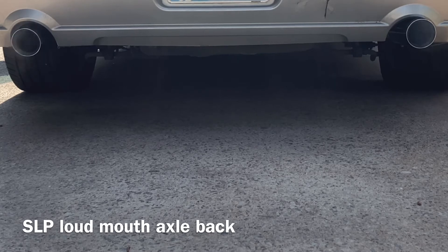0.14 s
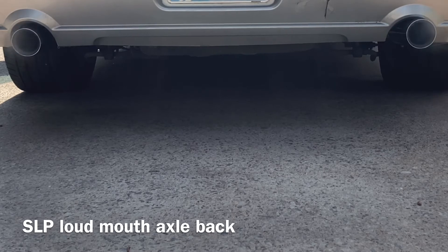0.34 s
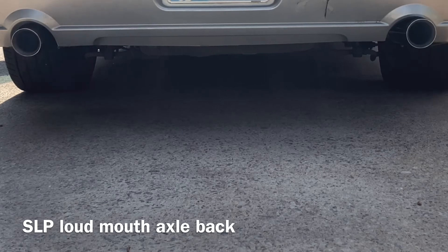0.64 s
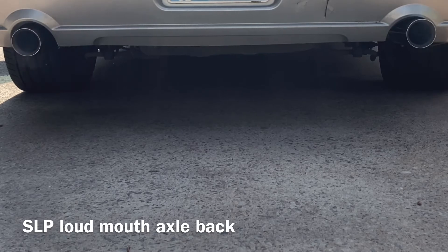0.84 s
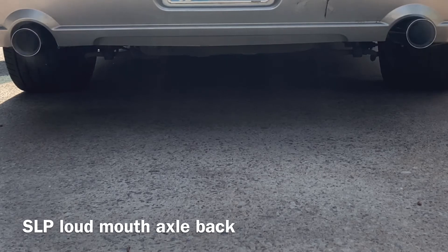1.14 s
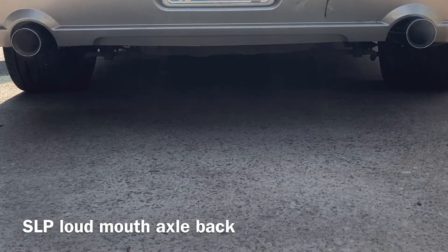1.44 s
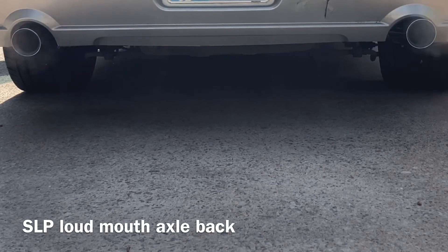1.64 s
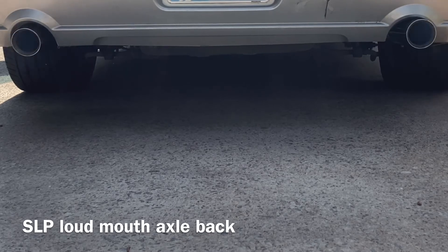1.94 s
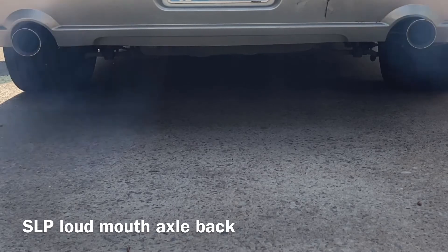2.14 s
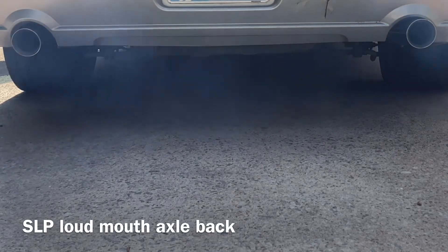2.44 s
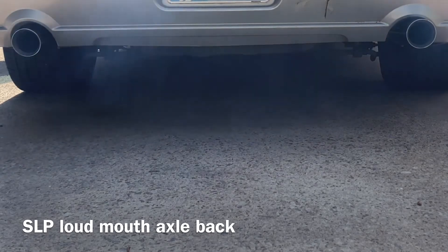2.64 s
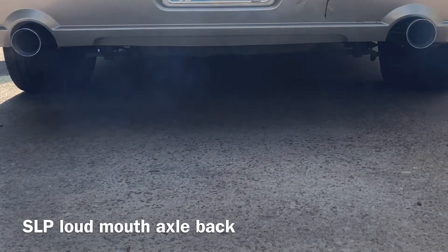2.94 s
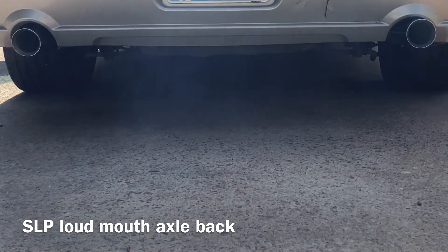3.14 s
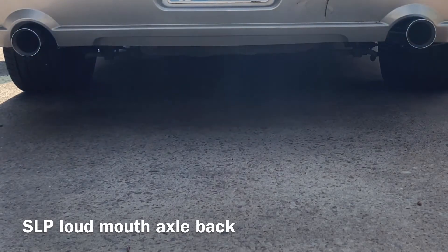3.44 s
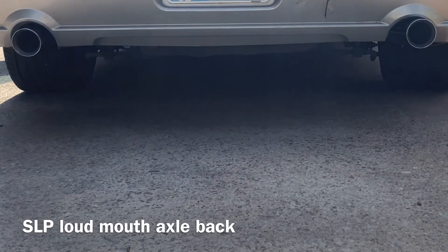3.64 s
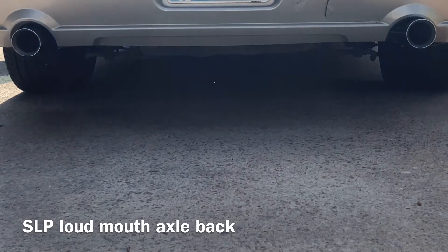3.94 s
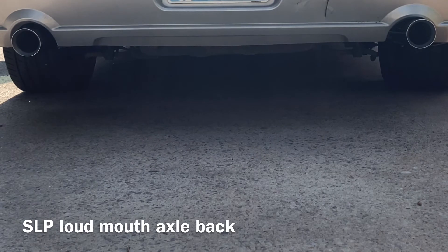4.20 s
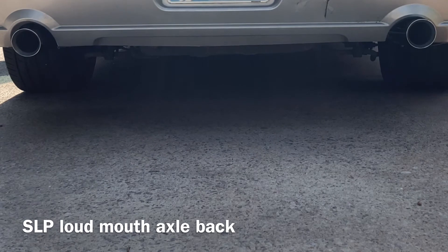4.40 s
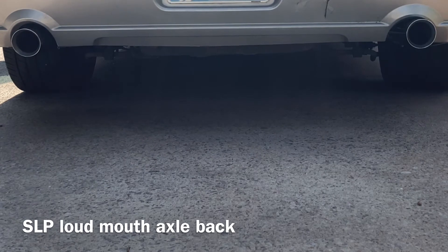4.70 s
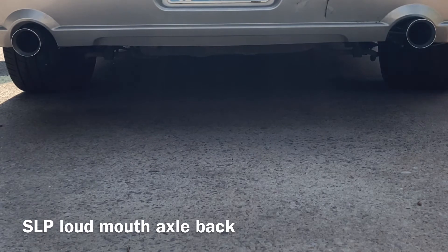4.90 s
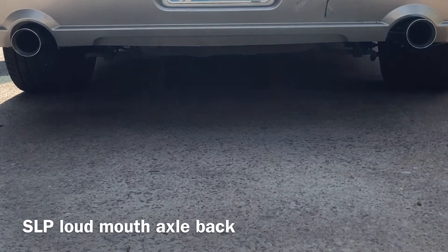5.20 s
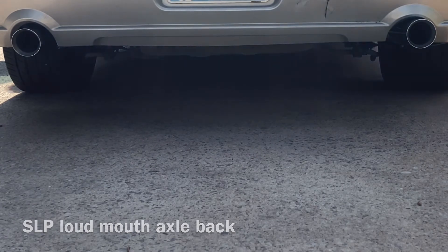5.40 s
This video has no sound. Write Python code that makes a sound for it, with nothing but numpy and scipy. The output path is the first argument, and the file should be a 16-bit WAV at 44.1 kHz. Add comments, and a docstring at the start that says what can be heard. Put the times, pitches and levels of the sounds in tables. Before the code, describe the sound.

Heard outdoors from close behind the tailpipes, a loud V8 car engine is revved twice. The first rev booms and rasps with scattered pops, then drops into a burble. The second climbs higher and ends in a quick burst of cracks and a low thump. Puffs of exhaust briefly buffet the microphone, and the engine pops and burbles as it slows to an uneven idle.

```python
"""A cross-plane V8 with a loud twin exhaust, heard outdoors from close behind the car.
It revs at once: the train of firing pulses booms, rasps and hisses in the pipes, where unburnt fuel pops.
The throttle shuts at 0.5 s, and the falling engine burbles over a faint timing-chain whine.
A second, higher rev peaks near 2 s with sharp cracks and a thump of gas. After more pops and burble
the speed sinks, by about 5 s, to an idle made lumpy by the uneven firing of the two banks."""
import sys
import numpy as np
from scipy import signal
from scipy.fft import rfft, irfft, next_fast_len
from scipy.io import wavfile
from scipy.ndimage import uniform_filter1d

SR = 44100
rng = np.random.default_rng(int(sys.argv[2]) if len(sys.argv) > 2 else 0)


def int16_out(signal):
    """Quantize to a 16-bit WAV file."""
    q = np.round(np.clip(np.atleast_2d(signal).T, -1, 1) * 32767)
    wavfile.write(sys.argv[1], SR, q.astype(np.int16))


N = 245195
TIME = np.arange(N) / SR
PADDED = next_fast_len(N + 16384)
BINS = np.maximum(np.arange(PADDED // 2 + 1) * SR / PADDED, 1)
IDLE_HZ, SHOCK_HZ = 89, 240   # firing rates: at idle, and from which driven pulses steepen fully

# Engine speed. Each row: time in seconds, firing rate in Hz.
FIRING_RATE = [(0.0, 88.3), (0.07, 95.5), (0.22, 136.6), (0.42, 217.3), (0.5, 233.4), (0.75, 213.2),
               (0.83, 215.4), (0.9, 191.8), (1.24, 144.8), (1.55, 115.6), (1.62, 122.3), (1.94, 255.0),
               (2.08, 323.9), (2.17, 336.3), (2.33, 330.7), (2.66, 279.8), (3.29, 194.3), (3.53, 165.4),
               (4.07, 120.8), (4.36, 105.2), (4.7, 93.9), (4.92, 89.7), (5.56, 88.3)]
# Each row: throttle opening and shutting in seconds, depth of fuel cut from 0 to 1,
# overrun start and decay time in seconds, overrun strength from 0 to 1.
REVS = [(-.04, 0.49, 0.08, .8, .26, 0.95), (1.555, 2.035, 0.92, 2.393, 0.12, 0.55)]
# In firing order. Each row: bank 0 or 1, pulse strength in dB.
CYLINDERS = [(0, 5), (1, 5.5), (1, 2), (0, 2), (1, -3), (0, -1), (0, 6.5), (1, -11)]
# Pipe resonances met by the firing tone. Each row: firing rate in Hz, level in dB.
TONE_COASTING = [(88, -20.5), (103, -14.5), (114, -18.5), (128, -17.5), (148, -12.5), (168, -18.5),
                 (205, -21), (230, -20.5), (250, -16), (270, -23.5), (320, -23)]
TONE_DRIVEN = [(88, -9.5), (105, -7.5), (125, -9.5), (152, -9), (175, -12.5), (220, -13), (300, -12.5),
               (335, -19)]
# Each row: multiple of the cycle rate, then relative level in dB idling, coasting, driven, in fuel cut.
OVERTONE_OUTLINE = [(2, -17, -9, -30, -11.5), (5.9, 0, 0, -7.5, 6), (8.06, 1, 0.5, -8.5, -10.5),
                    (12.1, -1.5, -3.5, -1, -1), (14.4, 0.5, -2.5, -7.5, -9), (16, 3.5, 3.5, 4.5, -4),
                    (17.5, -10, -12, -13, -2), (24, -8.5, -6, -3, -9), (25.4, -12, -12, -14, -11),
                    (40.5, -7, -13, -11.5, -20)]
# Offset of the odd multiples in dB, for the same four states.
ODD_DB = (-6, -8, -1.5, -4)
# Layer gains. Each lists, in dB: idle level, change per doubling of speed, level at full load,
# change in fuel cut, change in overrun.
OVERTONE_LEVEL = (-24.7, 1, -15.5, -8.5, 0.5)
BURBLE_LEVEL = (-35.5, 7, -16, -14.5, 12.5)
RASP_LEVEL = (-40.5, -1.5, -22, -1.5, 1)
HISS_LEVEL = (-51.5, 2.5, -31.5, -4.5, 0.5)
# Spectral envelopes of the sources. Each row: frequency in Hz, gain in dB.
PIPE_SPECTRUM = [(40.0, -21), (70.0, -10), (100.0, -9), (150.0, -1), (220.0, -4), (290.0, -3),
                 (360.0, -2.5), (440.0, -1.5), (520.0, -1), (650.0, -5), (850.0, -11), (1200.0, -19.5),
                 (2000.0, -2)]
DRONE_SPECTRUM = [(350, -19), (490, 8.5), (560, -5), (650, 2.5), (850, -21), (1030, -21.5), (1250, -22),
                  (2500, -50)]
BURBLE_SPECTRUM = [(25, -31.5), (55, -7.5), (100, -4.5), (160, -1), (250, -1), (350, -1.5), (470, 0),
                   (570, -11), (700, -9.5), (900, -22.5), (1060, -16), (1250, -30.5), (2500, -40.5),
                   (6000, -45)]
RASP_SPECTRUM = [(300, -36), (700, 6), (1030, 2), (1230, -5.5), (1550, 1.5), (1900, 0.5), (2300, 1),
                 (2800, -1), (3300, -4.5), (3800, -19), (5000, -12), (8000, -39), (15000, -28)]
HISS_SPECTRUM = [(1200, -23), (3000, -9), (3700, 0.5), (4500, -3), (5600, 0.5), (7500, 1.5), (9500, -2),
                 (11500, 1.5), (13500, -4), (15500, -12.5)]
WHINE_SPECTRUM = [(3000, -28), (3800, -10.5), (4500, 4.5), (5300, -4.5), (6500, -40), (8000, 0),
                  (11500, 9.5), (15000, 4)]
POP_SPECTRUM = [(60, -23), (200, 8), (450, 0), (800, 6), (1300, -1.5), (2400, 4), (3200, 1), (3800, -5),
                (4800, -25), (7000, -63), (15000, -50)]
CRACK_SPECTRUM = [(200, 3), (600, 20), (1300, -26), (2500, 13), (4000, 8.5), (7000, 2.5), (11000, 0),
                  (15500, -17)]
# Fuel pops in the pipes, and cracks atop the second rev. Each row: start in seconds, level in dB.
POPS = [(.086, -9), (.153, 1), (.2215, -7), (.269, -15), (.327, -9), (.502, -21), (.54, -2), (.572, -6.5),
        (.807, -32), (.8505, -1), (.867, -23), (.897, -21), (.934, -15), (1.008, -31), (1.033, -31),
        (1.689, 0.5), (1.927, -1), (2.073, -10), (2.099, -7), (2.141, -8.5), (2.1885, -21), (2.415, -12.5),
        (2.468, -13), (2.481, -13.5), (2.507, -9), (2.534, -18), (2.627, -21)]
CRACKS = [(1.9578, -8.5), (1.9726, -2), (1.9872, -6), (2.0152, -11), (2.0285, -3.5), (2.042, -9),
          (2.056, -8.5), (2.07, -10.5), (2.1, -13)]
# Gusts of exhaust. Each row: centre in seconds, Gaussian width in seconds, level in dB.
GUSTS = [(.17, 0.044, -27), (.45, 0.049, -46), (0.845, .03, -27), (1.677, .035, -46), (2.486, 0.038, -29)]
# The two microphone ports. Each row: frequency in Hz, phase lead of the left in radians.
PORT_PHASE = [(20, .12), (300, .1), (800, .45), (1400, -.8), (2000, .3), (2700, -1.5), (3600, -2.9),
              (4150, -.5), (5200, -2.3), (6900, -6.3), (9200, -9.4), (11500, -12.6), (13700, -15.7),
              (16000, -19)]
# Each row: frequency in Hz, coherence of the turbulence at the ports from 0 to 1.
PORT_COHERENCE = [(60, .995), (300, .995), (640, .87), (1400, .72), (2500, .5), (5000, .7), (8000, .84),
                  (15000, .78)]
# Each row: frequency in Hz, level of left over right in dB.
PORT_BALANCE = [(60, -2.1), (250, 0.5), (600, 1), (1200, 1.5), (2200, 3.5), (4000, 2), (12000, -0.5)]


def from_db(db):
    """Amplitude ratio of a level in decibels."""
    return 10 ** (np.asarray(db) / 20)


def at_hz(points, hz):
    """A spectrum interpolated on a log-frequency axis."""
    known_hz, values = np.transpose(points)
    return np.interp(np.log(hz), np.log(known_hz), values)


def unit_rms(x, span_s=0.3):
    """Division by the running rms steadies the level and keeps the fast detail."""
    size = int(span_s * SR / 2)
    power = uniform_filter1d(uniform_filter1d(x * x, size), size)
    return x / np.sqrt(np.abs(power) + 1e-14)


def drift(rate_hz):
    """Slow random modulation with a spread of about 1."""
    return np.interp(TIME * rate_hz, np.arange(4096), rng.standard_normal(4096))


def colour(x, spectrum):
    """Minimum-phase filtering: folding the cepstrum makes the response causal."""
    cepstrum = irfft(np.log(from_db(at_hz(spectrum, BINS))), PADDED)
    cepstrum[1:PADDED // 2] *= 2
    cepstrum[PADDED // 2 + 1:] = 0
    return irfft(rfft(x, PADDED) * np.exp(rfft(cepstrum)), PADDED)[:N]


def impulses(at_s, sizes):
    """An impulse train, each impulse shared linearly between two samples."""
    place = np.clip(np.asarray(at_s) * SR, 0, N - 2)
    whole = place.astype(int)
    late = place - whole
    return np.bincount(whole, sizes * (1 - late), N) + np.bincount(whole + 1, sizes * late, N)


def fade(x, decay_s):
    """Exponential decay of every impulse."""
    return signal.lfilter([1], [1, -np.exp(-1 / (decay_s * SR))], x + 1e-18)


def ramp(start_s, length_s):
    """A linear rise from 0 to 1."""
    return np.clip((TIME - start_s) / length_s, 0, 1)


def engine_state(drive_s=0.07, open_s=0.12, shut_s=0.19, onset_s=0.0077, settle_s=0.97):
    """Four controls from 0 to 1: throttle, driven firing (until the overrun), fuel cut, ragged overrun."""
    throttle = driven = cut = overrun = 0
    for opens, shuts, depth, ragged, decay_s, strength in REVS:
        closed, onset = ramp(shuts, shut_s), ramp(ragged, onset_s)
        ajar = 0.35 * np.exp(-np.maximum(TIME - shuts, 0) / settle_s)   # the throttle stays partly open
        throttle = np.maximum(throttle, ramp(opens, open_s) * (1 - closed * (1 - ajar)))
        driven = np.maximum(driven, ramp(opens, drive_s) * (1 - onset * (1 - ajar)))
        cut = cut + depth * closed * (1 - onset)
        overrun = overrun + strength * onset * np.exp(-np.maximum(TIME - ragged, 0) / decay_s)
    return throttle, driven, cut, overrun


def layer_gain(level, firing_hz, load, cut, overrun):
    """Amplitude follows a power law of speed, goes to full under load, and shifts in cut and overrun."""
    idle_db, doubling_db, full_db, cut_db, overrun_db = level
    shut_db = idle_db + doubling_db * np.log2(firing_hz / IDLE_HZ)
    return from_db(shut_db + load * (full_db - shut_db) + cut * cut_db + overrun * overrun_db)


def firing_tone(firing_hz, turn, driven, cut, overrun, cut_db=-9, overrun_db=-4.5, waver_db=0.35):
    """Resonance: the boom at the firing rate swells as it passes each mode of the pipes."""
    pipe_db = (1 - driven) * at_hz(TONE_COASTING, firing_hz) + driven * at_hz(TONE_DRIVEN, firing_hz)
    level_db = pipe_db + cut_db * cut + overrun_db * overrun + waver_db * drift(24.95)
    return np.sqrt(2) * from_db(level_db) * np.sin(2 * np.pi * len(CYLINDERS) * turn)


def exhaust_overtones(cycle_hz, turn, throttle, cut, lag_cycles=0.0343, jitter_s=0.00008, top=40):
    """Fourier series: the banks fire unevenly and one arrives late, filling in the cycle's harmonics."""
    banks, strength_db = np.transpose(CYLINDERS)
    arrival = np.arange(len(banks)) / len(banks) + lag_cycles * banks
    coasting = np.clip((cycle_hz - 12) / 5, 0, 1)   # rises between 12 and 17 Hz
    turn = turn + coasting * (1 - cut) * jitter_s * cycle_hz * drift(60)   # jitter blurs the high lines
    waver_db = 2.4 + 2.1 * coasting
    multiples, *outlines = np.transpose(OVERTONE_OUTLINE)
    harmonics = 0
    for k in np.setdiff1d(np.arange(2, top + 1), [len(banks)]):   # all but the firing tone
        level_db, *state_db = [np.interp(k, multiples, outline) + odd_db * (k % 2)
                               for outline, odd_db in zip(outlines, ODD_DB)]
        for share, db in zip((coasting, throttle, cut), state_db):
            level_db = level_db + share * (db - level_db)
        level_db = level_db + at_hz(PIPE_SPECTRUM, k * cycle_hz) + waver_db * drift(12)
        phasors = from_db(strength_db) * np.exp(-2j * np.pi * k * arrival)
        harmonics -= from_db(level_db) * np.cos(2 * np.pi * k * turn + np.angle(phasors.sum()))
    return unit_rms(harmonics + from_db(-18) * pipe_drone(turn, lowest=top + 1))


def pipe_drone(turn, lowest, count=70):
    """Source and filter: equally strong high harmonics excite the upper pipe resonances."""
    angle = np.linspace(0, 1, 4096)
    cycle = sum(np.cos(2 * np.pi * (k * angle + rng.random())) for k in range(lowest, lowest + count))
    return colour(np.interp(turn % 1, angle, cycle), DRONE_SPECTRUM)


def burble(fired_s, scatter_s=0.000752, swirl_db=-24, swirl_s=0.0027):
    """Cycle-to-cycle variation: each firing's departure from the mean thuds through the pipes."""
    sizes = np.tanh(rng.standard_normal(len(fired_s)))
    thuds = impulses(fired_s + scatter_s * rng.standard_normal(len(fired_s)), sizes)
    swirl = from_db(swirl_db) * fade(np.abs(thuds), swirl_s) * rng.standard_normal(N)
    return unit_rms(colour(thuds + swirl, BURBLE_SPECTRUM), span_s=0.044)


def rasp(fired_s, cylinder_db, steepening, puff_s=0.0051, steady=0.32, shock_db=19, scatter_s=0.00032):
    """Nonlinear steepening: each pulse tears into turbulence, and under load its front becomes a shock."""
    load = np.interp(fired_s, TIME, steepening)
    spread_db = 1.5 + 4 * load
    sizes = from_db(cylinder_db + spread_db * np.clip(rng.standard_normal(len(fired_s)), -2, 2))
    puffs = (fade(impulses(fired_s, sizes), puff_s) + steady) * rng.standard_normal(N)
    fronts_s = fired_s + scatter_s * rng.standard_normal(len(fired_s))
    shocks = impulses(fronts_s, sizes * from_db(shock_db * load))
    return unit_rms(colour(puffs + shocks, RASP_SPECTRUM), span_s=0.25)


def jet_hiss(fired_s, cylinder_db, rise_s=0.001, puff_s=0.0079, steady=0.97, spread_db=3.5):
    """Jet noise at the pipe tips, amplitude-modulated by every pulse."""
    sizes = from_db(cylinder_db + spread_db * rng.standard_normal(len(fired_s)))
    puffs = fade(fade(impulses(fired_s, sizes), puff_s), rise_s) / (rise_s * SR)
    jet = (puffs + steady) * rng.standard_normal(N)
    return unit_rms(colour(jet, HISS_SPECTRUM), span_s=0.25)


def chain_whine(cycle_hz, turn, teeth=22, wobble_cycles=0.33, flutter_db=5, fall_db=0.75):
    """Periodic meshing: the timing chain's high harmonics sweep through stationary resonances."""
    whine = 0
    for k in range(4, 18):
        level_db = at_hz(WHINE_SPECTRUM, k * teeth * cycle_hz) - fall_db * k + flutter_db * drift(25.12)
        whine += from_db(level_db) * np.sin(2 * np.pi * (k * teeth * turn + wobble_cycles * drift(60)))
    return whine


def backfire(events, spectrum, tail_s, tail_db):
    """Impulse excitation: each bang is a pressure front with a short turbulent tail."""
    start_s, level_db = np.transpose(events)
    fronts = impulses(np.round(start_s * SR) / SR, from_db(level_db))
    tails = from_db(tail_db) * fade(fronts, tail_s) * rng.standard_normal(N)
    response_peak = np.abs(colour(impulses([0], np.ones(1)), spectrum)).max()
    return colour(fronts + tails, spectrum) / response_peak


def gusts(band_hz=(32, 120)):
    """Wind noise: puffs of exhaust gas buffet the microphone with low-frequency pressure."""
    strength = sum(from_db(db) * np.exp(-0.5 * ((TIME - s) / width) ** 2) for s, width, db in GUSTS)
    band = signal.butter(2, band_hz, "band", fs=SR, output="sos")
    rumble = signal.sosfilt(band, rng.standard_normal(N + SR))
    return strength * unit_rms(rumble, span_s=0.07)[SR:]


def lift_off_thump(at_s=2.058, level_db=-10, start_hz=160, end_hz=45, decay_s=0.0074):
    """A damped, sinking oscillation: a slug of gas leaves the pipes as the throttle shuts."""
    age = np.maximum(TIME - at_s, 0) / decay_s
    hz = end_hz + (start_hz - end_hz) * np.exp(-age)
    envelope = from_db(level_db) * age * np.exp(1 - age)
    return envelope * np.sin(2 * np.pi * np.cumsum(hz * (age > 0)) / SR)


def microphone(sound, stray):
    """Partial coherence: two ports differ in phase and level, and in the treble in turbulence too."""
    coherence = np.clip(at_hz(PORT_COHERENCE, BINS), 0, 1)
    lead = np.interp(BINS, *np.transpose(PORT_PHASE))
    sides = np.array([[0.5], [-0.5]])
    common = np.sqrt((1 + coherence) / 2) * rfft(sound, PADDED)
    opposed = 2 * sides * np.sqrt((1 - coherence) / 2) * rfft(stray, PADDED)
    response = np.exp(1j * sides * lead) * from_db(sides * at_hz(PORT_BALANCE, BINS))
    return irfft((common + opposed) * response, PADDED)[:, :N]


def scene():
    """Superposition: layers that follow speed and throttle add to the timed bangs, gusts and thump."""
    firing_hz = np.interp(TIME, *np.transpose(FIRING_RATE))
    throttle, driven, cut, overrun = engine_state()
    count = len(CYLINDERS)
    cycle_hz = firing_hz / count
    turn = np.cumsum(cycle_hz) / SR   # engine cycles elapsed
    firings = np.arange(int(turn[-1] * count))
    fired_s = np.interp(firings / count, turn, TIME)
    cylinder_db = np.array(CYLINDERS)[firings % count, 1]
    burble_gain, rasp_gain, hiss_gain = (layer_gain(level, firing_hz, throttle, cut, overrun)
                                         for level in (BURBLE_LEVEL, RASP_LEVEL, HISS_LEVEL))
    steepening = throttle * np.minimum(firing_hz / SHOCK_HZ, 1)
    swell_db = (1 - throttle) * (at_hz(TONE_COASTING, firing_hz) - at_hz(TONE_COASTING, IDLE_HZ))
    hiss_swell = from_db(0.35 * swell_db)   # the hiss takes up part of the pipes' resonance

    def turbulence():
        """The aperiodic part of the exhaust, drawn afresh at each call."""
        return (burble_gain * burble(fired_s) + rasp_gain * rasp(fired_s, cylinder_db, steepening)
                + hiss_gain * hiss_swell * jet_hiss(fired_s, cylinder_db))

    starved = np.clip(cut + overrun, 0, 1)   # cylinders that fail to fire sound as in fuel cut
    overtone_gain = layer_gain(OVERTONE_LEVEL, firing_hz, driven, cut, overrun)
    overtones = overtone_gain * exhaust_overtones(cycle_hz, turn, throttle, starved)
    note = firing_tone(firing_hz, turn, driven, cut, overrun) + overtones
    whine_db = -10.5 + 3.5 * np.log2(firing_hz / IDLE_HZ)
    whine = from_db(whine_db) * hiss_gain * (1 - throttle) * chain_whine(cycle_hz, turn)
    pops = backfire(POPS, POP_SPECTRUM, tail_s=0.0015, tail_db=-19)
    cracks = backfire(CRACKS, CRACK_SPECTRUM, tail_s=0.0009, tail_db=-7)
    sound = note + whine + pops + gusts() + cracks + lift_off_thump() + turbulence()
    return microphone(sound, stray=turbulence())


def record(dry, ceiling=0.96, cutoff_hz=15750):
    """Soft saturation rounds the loudest peaks; a steep low-pass removes the highest treble."""
    rounded = dry / (1 + (dry / ceiling) ** 6) ** (1 / 6)
    return signal.sosfilt(signal.ellip(10, 0.1, 80, cutoff_hz, fs=SR, output="sos"), rounded)


dry = scene()
out = record(dry)
int16_out(out)
```